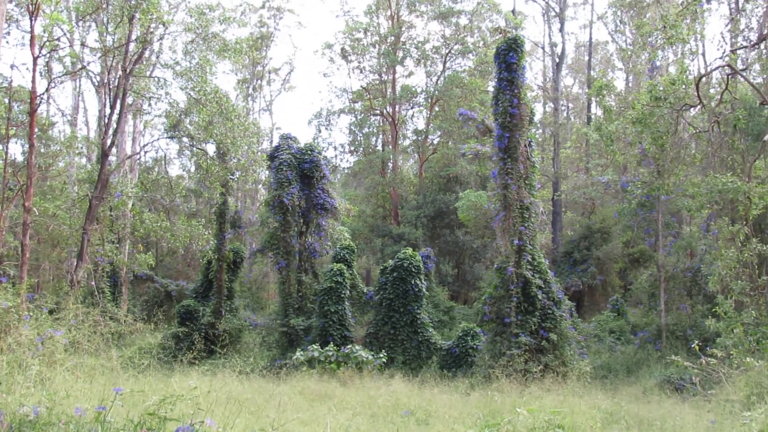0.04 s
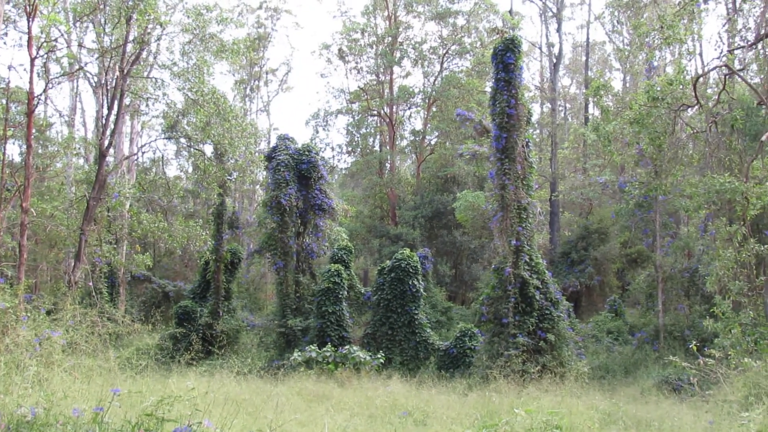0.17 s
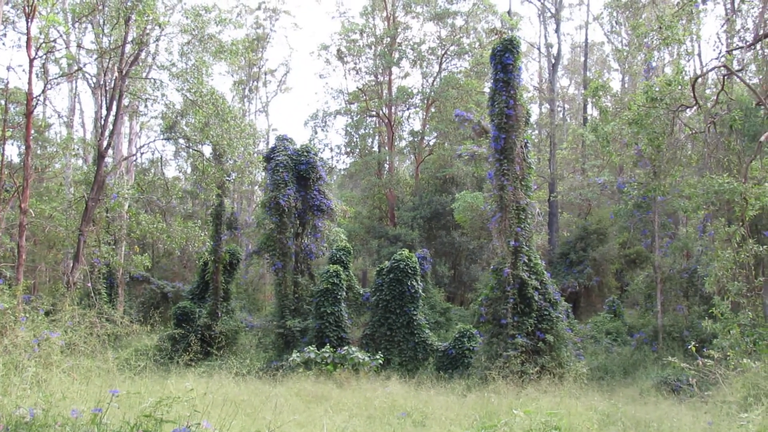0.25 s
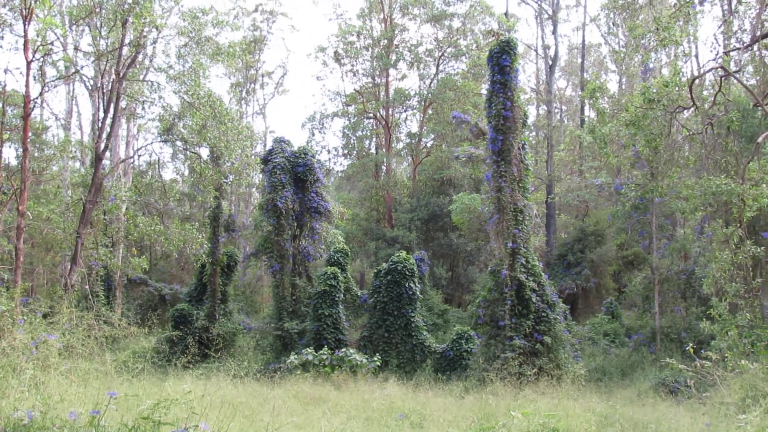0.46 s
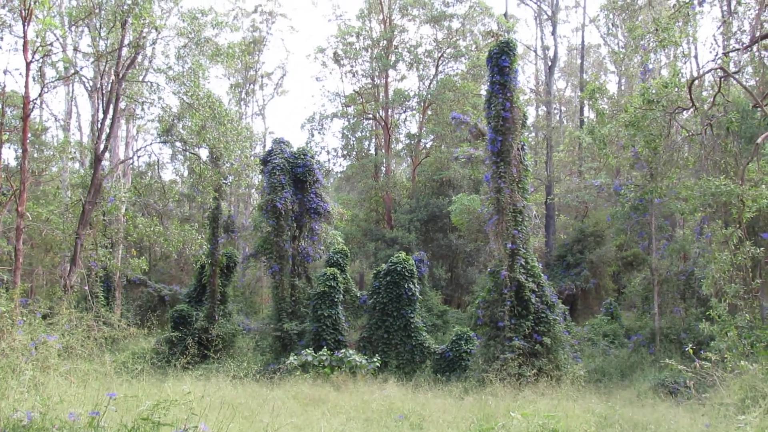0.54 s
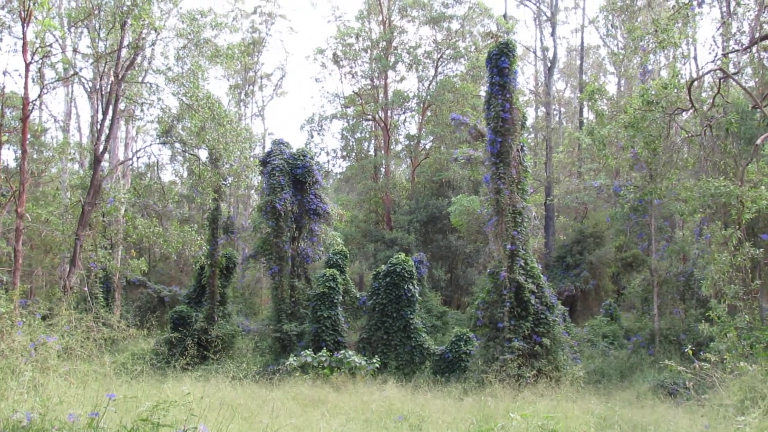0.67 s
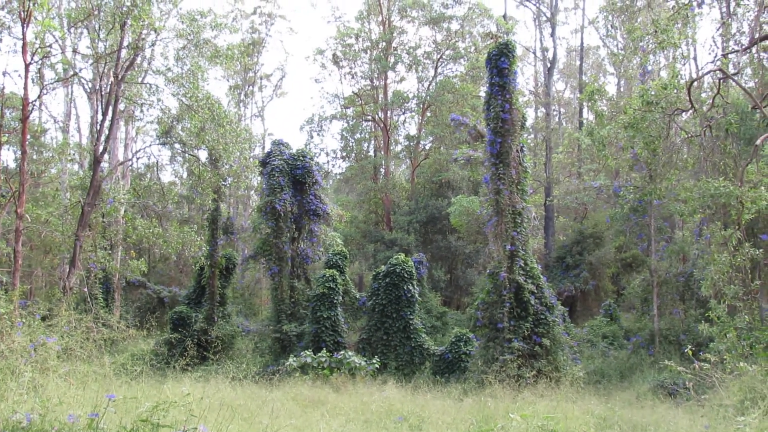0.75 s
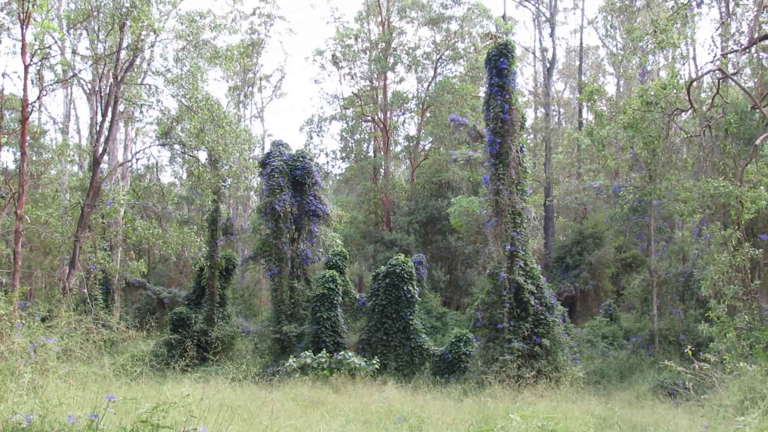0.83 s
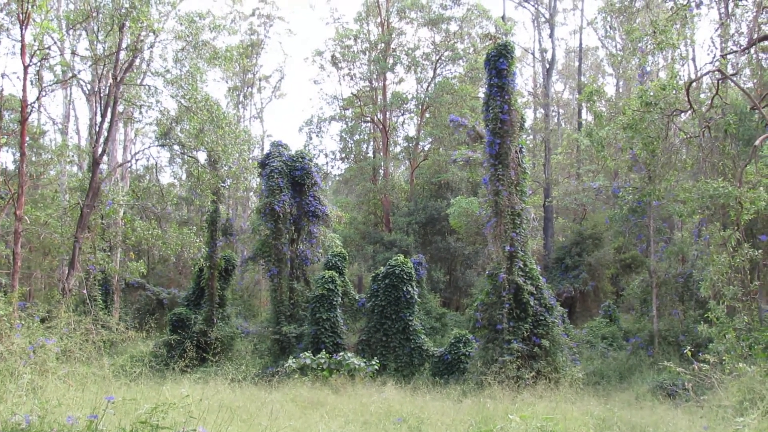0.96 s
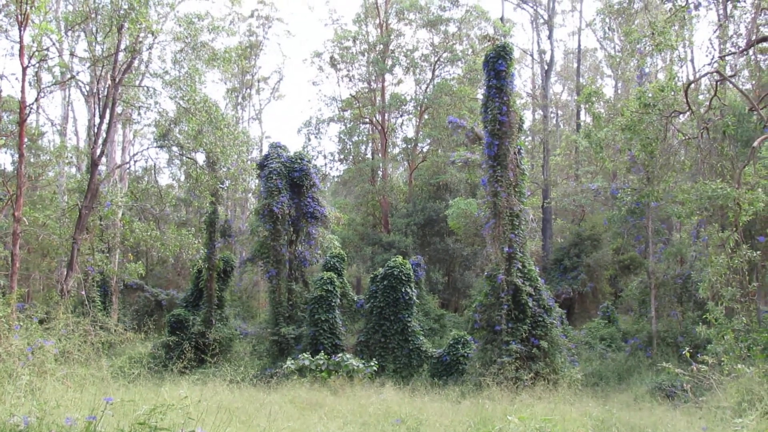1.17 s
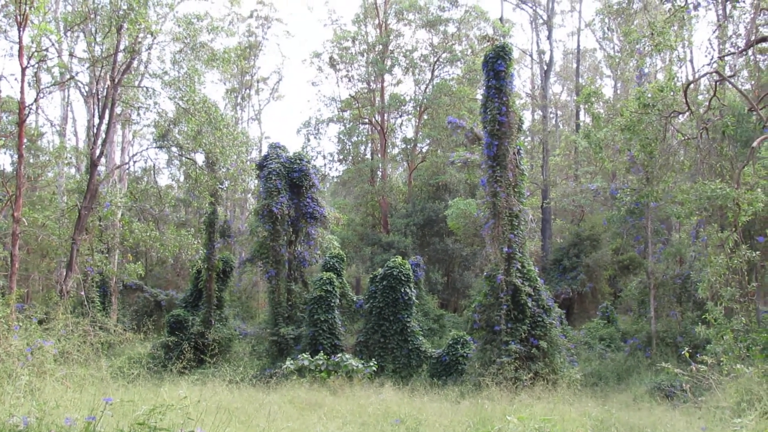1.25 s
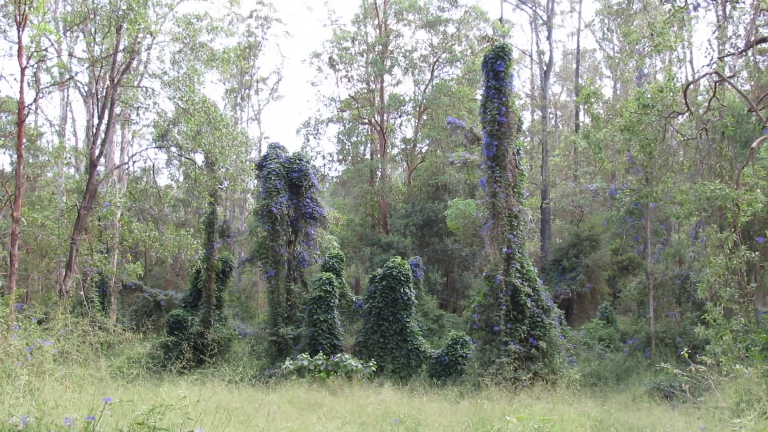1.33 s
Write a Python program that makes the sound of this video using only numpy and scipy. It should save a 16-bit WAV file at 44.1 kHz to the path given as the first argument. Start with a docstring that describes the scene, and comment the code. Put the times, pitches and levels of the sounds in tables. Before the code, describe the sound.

Bellbirds ping about ten times around a bush clearing, each high, pure note ringing on among the trees. The loudest come at 0.2 and 0.6 to 0.75 seconds, right of centre; softer ones follow from 1.1. Distant nasal chirps and thin whistles lead to one rising call and a faint high twitter around 1 second. Underneath are steady hiss, two dry ticks early and a faint low bump at 0.6.

```python
"""Bellbirds ping from the trees around a bush clearing: each ping is a grace note and a nearly pure
tone that rings on among the trunks. Farther off, other birds give nasal chirps and one rising call,
both coloured by throat resonances, along with thin whistles and a high twitter.
Underneath lie a steady hiss, one soft low bump and two dry ticks."""
import sys
import numpy as np
from scipy import signal
from scipy.fft import rfft, irfft, next_fast_len
from scipy.io import wavfile
from scipy.ndimage import uniform_filter1d

SR = 44100
rng = np.random.default_rng(int(sys.argv[2]) if len(sys.argv) > 2 else 0)


def master_out(mix):
    """Clip the mix to full scale and print it as 16-bit PCM to the path in sys.argv[1]."""
    frames = np.transpose(np.atleast_2d(mix))
    ceiling = np.clip(frames, -1, 1)
    pcm = np.round(ceiling * 32767).astype(np.int16)
    wavfile.write(sys.argv[1], SR, pcm)


N = 61739
T = np.arange(N) / SR
BIN_HZ = np.fft.rfftfreq(N, 1 / SR)


def from_db(db):
    """Decibels to gain."""
    return 10 ** (np.asarray(db) / 20)


def eq_db(curve, hz):
    """Read an EQ curve on a log-frequency axis."""
    f, db = np.transpose(curve)
    return np.interp(np.log(np.maximum(hz, 1)), np.log(f), db)


def panned(x, pan_db):
    """Constant-power pan; pan_db is left over right."""
    gains = from_db([[pan_db / 2], [-pan_db / 2]])
    return x * gains / np.sqrt(np.mean(gains ** 2))


def drift(rate_hz):
    """Random modulator of spread 1, rolling off above rate_hz."""
    wander = irfft(rfft(rng.standard_normal(N)) / (1 + (BIN_HZ / rate_hz) ** 2), N)
    return wander / wander.std()


def gate(start, length, attack, release):
    """Envelope with a smooth attack, a hold and an exponential release; times in seconds."""
    t = T - start
    rise = np.sin(np.pi / 2 * np.clip(t / attack, 0, 1))
    return rise * np.exp(-np.clip((t - length) / release, 0, 20))


def voice(hz, harmonics_db):
    """Additive tone that follows a pitch curve."""
    phase = 2 * np.pi * np.cumsum(hz) / SR
    return np.sqrt(2) * sum(from_db(db) * np.sin(k * phase) for k, db in enumerate(harmonics_db, 1))


def noise_band(hz, octaves):
    """Noise of spread 1 around one frequency."""
    shape = np.exp(-(np.log2((BIN_HZ + 1) / hz) / octaves) ** 2 / 2)
    band = irfft(rfft(rng.standard_normal(N)) * shape, N)
    return band / band.std()


# Colour of the hiss before the swell: f/Hz, density/(dB per Hz)
HISS_EQ = [(20, -89), (40, -82.5), (70, -80), (120, -83), (200, -79.5), (400, -83.5), (800, -88),
           (1500, -91), (2600, -91), (4000, -95), (5500, -97.5), (9000, -99), (13000, -99.5), (15500, -102)]
# Stereo width of the hiss: f/Hz, side over mid/dB
HISS_SPREAD = [(30, 4.5), (120, 1), (350, 6), (700, 5), (1400, 2), (3000, 0), (6000, -0.5), (13000, -4.5)]
# Fader ride on its midrange: t/s, gain/dB
BREEZE_SWELL = [(0, 5), (.33, 4.5), (.7, 0.5), (1.05, 0.5), (1.4, 3.5)]

def hiss():
    """A wide, steady noise bed whose midrange swells and ebbs like a breeze."""
    mid, side = rfft(rng.standard_normal((2, N)))
    width = from_db(eq_db(HISS_SPREAD, BIN_HZ))
    stereo = (mid + width * side * [[1], [-1]]) / np.sqrt(1 + width ** 2)
    bed = stereo * from_db(eq_db(HISS_EQ, BIN_HZ)) * np.sqrt(SR / 2)
    midrange = np.exp(-np.log2((BIN_HZ + 1) / 1570) ** 2 / 2)   # an octave either side of 1570 Hz
    swell = from_db(np.interp(T, *np.transpose(BREEZE_SWELL)))
    return panned(irfft(bed * (1 - midrange), N) + swell * irfft(bed * midrange, N), pan_db=1.05)


def puff():
    """A faint low bump, perhaps air touching the microphone."""
    envelope = gate(start=.625, length=.046, attack=.02, release=.02)
    return from_db(-59) * envelope * noise_band(hz=65.5, octaves=.45)


# Fade of the twitter, in and out: t/s, level/dB
TWITTER_FADE = [(.95, -73), (1.02, -58), (1.12, -54.5), (1.24, -58), (1.4, -74)]
# Its colour: f/Hz, gain/dB
TWITTER_EQ = [(4500, -27), (5600, -14), (6000, -6), (6350, -15), (6900, -7), (7200, -8.5), (7800, -38),
              (12000, -62)]

def twitter():
    """Small birds far off, smeared by the forest into a high shimmer of noise."""
    band = irfft(rfft(rng.standard_normal((2, N))) * from_db(eq_db(TWITTER_EQ, BIN_HZ)), N)
    level_db = np.interp(T, *np.transpose(TWITTER_FADE)) + 2.1 * drift(rate_hz=30)
    return band / band.std() * from_db(level_db)


# Whistle cues: t/s, length/s, start f/Hz, end f/Hz, level/dB, pan/dB
WHISTLE_CUES = [(0.122, 0.098, 1138, 1169, -62, 14), (0.207, 0.23, 1183, 1198, -64, 2),
                (0.51, .13, 1191, 1192, -64, 6.5), (0.245, 0.17, 1985, 1952, -65.5, 0),
                (0.317, 0.31, 2368, 2372, -59.5, -1.5), (0.736, 0.164, 2338, 2374, -66.5, -15),
                (0.835, 0.028, 6900, 6820, -60, -4), (.925, 0.08, 6780, 6550, -59.5, -6),
                (1.037, 0.05, 6480, 6570, -60.5, 0), (1.091, 0.11, 6900, 6820, -60, 3),
                (1.206, 0.061, 6750, 6670, -59.5, 1), (0.875, 0.235, 885, 859, -68.5, 12),
                (1.263, 0.044, 2100, 2020, -62, -2), (1.327, 0.099, 1150, 1171, -63, 9)]

def whistles():
    """Faint, gliding pure notes from deep in the bush; returns direct sound and forest send."""
    direct = 0
    for start, length, start_hz, end_hz, db, pan_db in WHISTLE_CUES:
        glide = np.interp(T, [start, start + length], [start_hz, end_hz])
        pitch = glide * (1 + .0037 * drift(rate_hz=120))
        envelope = gate(start, length, attack=.013, release=.013)
        direct += panned(envelope * voice(pitch, [db]), pan_db)
    return direct, from_db(3.5) * direct


# Top of each chirp's arch: t/s, f/Hz, level before the throat/dB
CHIRP_CUES = [(.072, 1603, -52), (.284, 1640, -49), (.497, 1665, -49), (.750, 1646, -55.5)]
# Nasal throat resonances: f/Hz, gain/dB
CHIRP_FORMANTS = [(1100, -11), (1600, -10.5), (2300, -1), (2900, 4), (3200, 2), (3700, -15), (5000, -17.5)]

def chirps():
    """Far chirps arch in pitch through fixed throat resonances; returns direct sound and forest send."""
    calls = 0
    for peak_s, hz, db in CHIRP_CUES:
        arch = np.minimum(((T - peak_s) / .042) ** 2, 2)   # 0 at the top, 1 at 42 ms either side
        pitch = hz * (1 - .22 * arch + .0085 * drift(rate_hz=120))
        harmonics_db = [eq_db(CHIRP_FORMANTS, k * pitch) for k in range(1, 4)]
        calls += from_db(db) * (1 - arch / 2) * voice(pitch, harmonics_db)
    direct = panned(calls, pan_db=10)
    return direct, from_db(1) * direct


# Contour of the rising call: t/s, f/Hz, level before the throat/dB
RISING_CONTOUR = [(0.939, 1100, -84), (.957, 1204, -50), (0.974, 1380, -44), (1.0, 1494, -52.5),
                  (1.021, 1630, -43), (1.04, 1675, -53), (1.058, 1727, -40.5), (1.083, 1750, -66),
                  (1.112, 1740, -57)]
# Reedy throat resonances: f/Hz, gain/dB
RISING_FORMANTS = [(1200, -7.5), (1700, -27), (2400, -6.5), (3500, 2), (4200, -12), (5200, -22.5),
                   (6800, -23), (9000, -26)]

def rising_call():
    """An upward slur sweeps its harmonics through the throat; returns direct sound and forest send."""
    times, hz, db = np.transpose(RISING_CONTOUR)
    pitch = np.interp(T, times, hz) * (1 + .01197 * drift(rate_hz=206))
    envelope = from_db(np.interp(T, times, db)) * (T > times[0]) * (T < times[-1])
    harmonics_db = [eq_db(RISING_FORMANTS, k * pitch) for k in range(1, 7)]
    direct = panned(envelope * voice(pitch, harmonics_db), pan_db=-7)
    return direct, from_db(-3) * direct


# Tick cues: t/s, level/dB
TICK_CUES = [(0.206, -37), (.349, -41)]

def ticks():
    """Brief dry clicks near the pitch of the bellbirds."""
    envelope = sum(from_db(db) * gate(t, length=.0034, attack=.001, release=.0034) for t, db in TICK_CUES)
    return noise_band(hz=3060, octaves=.13) * envelope


FAR_T60_S, NEAR_T60_S, NEAR_DB, PREDELAY_S = 2, .26, 3.5, .013
TREBLE_HZ, TREBLE_LOSS_DB_PER_S = 7460, 28

def forest(send):
    """Trunks and leaves scatter a quick near ring and a long far tail, different for each ear."""
    decay = from_db(-60 * T / FAR_T60_S) + from_db(NEAR_DB - 60 * T / NEAR_T60_S)
    echoes = rng.standard_normal((2, N)) * decay * (T > PREDELAY_S)
    damped = echoes * from_db(-TREBLE_LOSS_DB_PER_S * T)   # air and leaves swallow the top sooner
    size = next_fast_len(2 * N)
    treble = 1 / (1 + (TREBLE_HZ / (np.fft.rfftfreq(size, 1 / SR) + 1)) ** 6)
    response = (1 - treble) * rfft(echoes, size) + treble * rfft(damped, size)
    response /= np.sqrt(uniform_filter1d(abs(response) ** 2, size=60, axis=1))   # no pitch is favoured
    return irfft(rfft(send, size) * response, size)[:, :N]


GRACE_LEAD_S, GRACE_PITCH_RATIO = .0178, .99   # the grace note comes just ahead, slightly flat
FLICK_HZ, FLICK_S, SAG_DB_PER_S = 297, .001427, 49
# Ping cues: t/s, f/Hz, length/s, direct level/dB, pan/dB, send level/dB, send pan/dB,
# grace note gain/dB, then the gains of harmonics 2, 3 and 4 at full envelope/dB
PING_CUES = [(0.038, 2935, 0.049, -54, 18, -42, 0.5, -1, -28, -28.5, -35),
             (.214, 2987, 0.056, -22.5, -5.5, -28.5, 1, -6.5, -24, -19, -26),
             (0.369, 2985, 0.021, -39.5, -4, -50.5, 6, -3, -16.5, -15, -34),
             (.641, 2977, 0.022, -22, -15.5, -28.5, -4, -13, -37.5, -27.5, -48),
             (0.665, 3332, 0.029, -33.5, -12.5, -36, -4.5, -17, -15, -24.5, -40),
             (0.744, 2927, 0.029, -29, -20, -32.5, -4.5, -5.5, -29.5, -29, -50),
             (1.097, 2962, .022, -40, 9.5, -40.5, 7, 2, -32, -31, -48),
             (1.147, 2966, 0.021, -41.5, 6, -44, -18, -4, -34, -31, -48),
             (1.230, 2870, 0.022, -41, -2, -40, 1.5, -11, -27, -26, -38),
             (1.390, 2964, .03, -45, 11, -43, -4, 3, -28, -32, -43)]

def bellbirds():
    """Each ping is a grace note and a held, nearly pure tone; returns direct sound and forest send."""
    direct, send = 0, 0
    for start, hz, length, db, pan_db, send_db, send_pan_db, grace_db, *overtones_db in PING_CUES:
        grace_s, turn_s = start - GRACE_LEAD_S, start - 2 * FLICK_S
        # each note snaps down onto its pitch
        flick = FLICK_HZ * (np.exp(-abs(T - grace_s) / FLICK_S) + np.exp(-abs(T - turn_s) / FLICK_S))
        wobble = .00441 * drift(rate_hz=107)
        pitch = hz * (np.where(T < turn_s, GRACE_PITCH_RATIO, 1) + wobble) + flick
        sag_db = -SAG_DB_PER_S * np.maximum(T - start, 0)
        flutter_db = 2 * drift(rate_hz=74)
        held = gate(start, length, attack=.0056, release=.0099) * from_db(sag_db + flutter_db)
        grace = from_db(grace_db) * gate(grace_s, .85 * GRACE_LEAD_S, attack=.0017, release=.0024)
        envelope = held + grace
        tone = envelope * voice(pitch, [0])
        fifth_db = overtones_db[-1] - 11.5
        overtones = voice(pitch, [-np.inf, *overtones_db, fifth_db])
        overtones *= envelope ** 1.4 * from_db(3 * drift(rate_hz=94))   # louder is brighter
        # the overtones arrive further left, and leaves scatter them more than the fundamental
        direct += from_db(db) * (panned(tone, pan_db) + panned(overtones, pan_db + 9))
        send += panned(from_db(send_db) * (tone + from_db(5) * overtones), send_pan_db)
    return direct, send


def scene():
    """Mix the birds and their fluttering forest ring with the ticks, the bump and the hiss."""
    direct, send = np.sum([bellbirds(), chirps(), rising_call(), whistles()], axis=0)
    depth = .31
    wander = np.array([drift(rate_hz=61), drift(rate_hz=61)])
    flutter = (1 + depth * wander) / np.sqrt(1 + depth ** 2)
    return direct + flutter * forest(send) + twitter() + ticks() + puff() + hiss()


def record(dry):
    """A steep high cut at 15.6 kHz on the master."""
    return signal.sosfiltfilt(signal.ellip(10, .05, 70, 15600, fs=SR, output="sos"), dry)


dry = scene()
out = record(dry)
master_out(out)
```